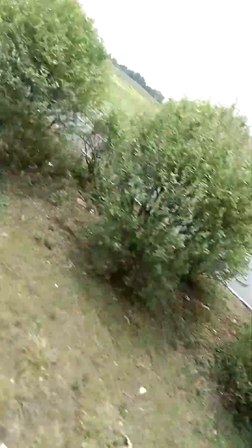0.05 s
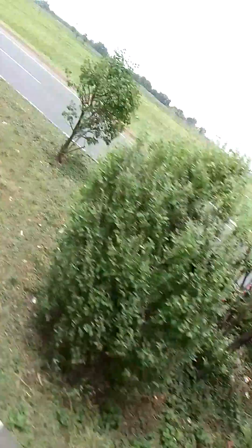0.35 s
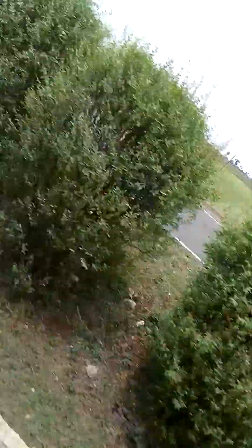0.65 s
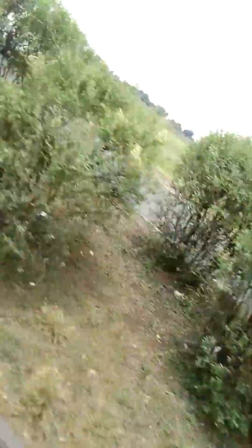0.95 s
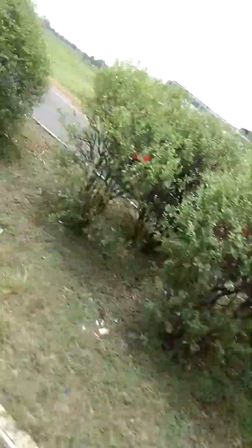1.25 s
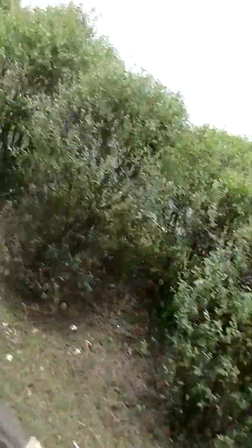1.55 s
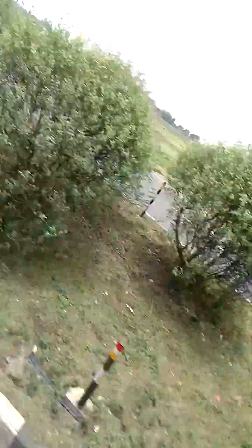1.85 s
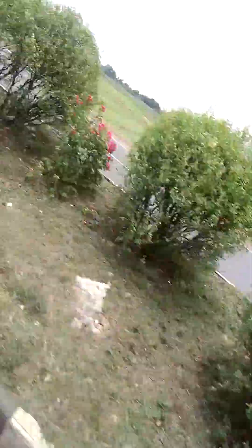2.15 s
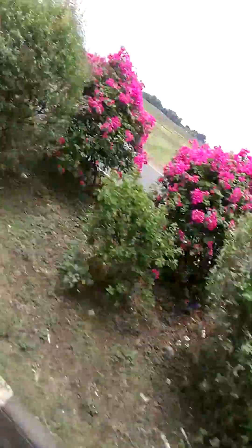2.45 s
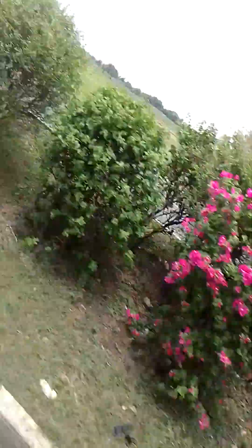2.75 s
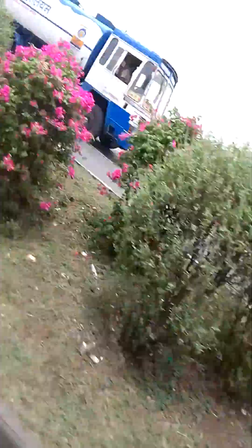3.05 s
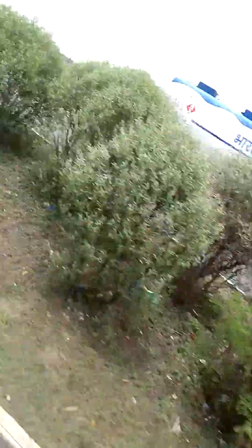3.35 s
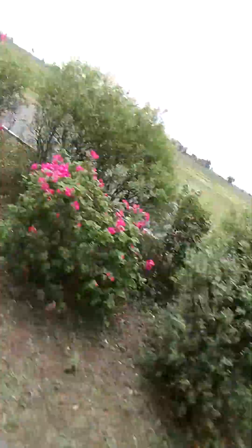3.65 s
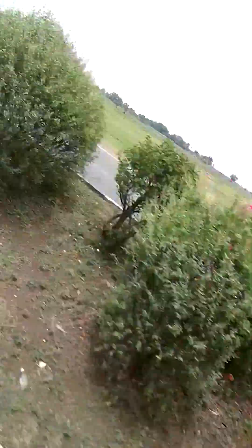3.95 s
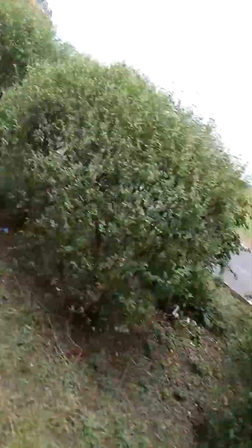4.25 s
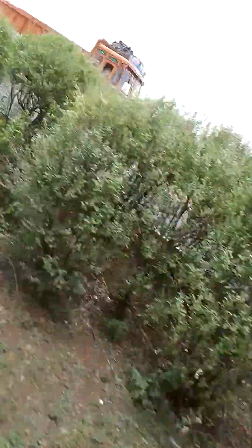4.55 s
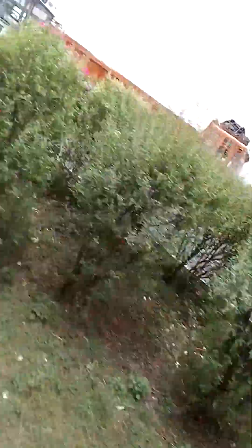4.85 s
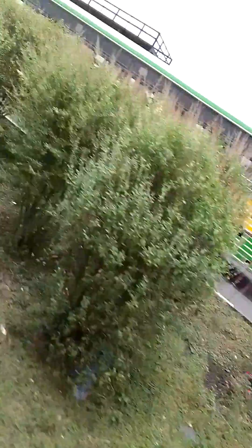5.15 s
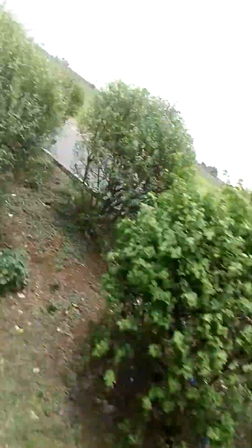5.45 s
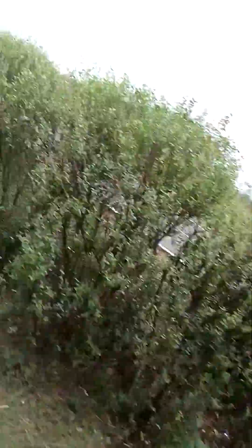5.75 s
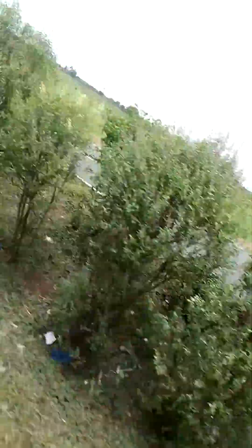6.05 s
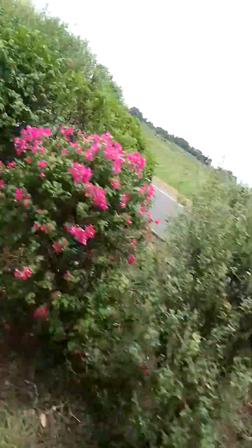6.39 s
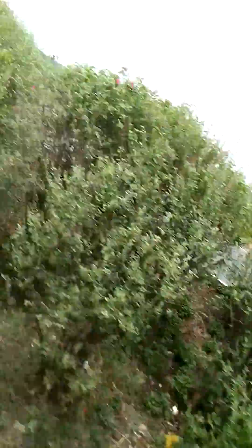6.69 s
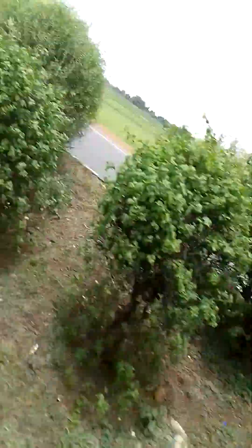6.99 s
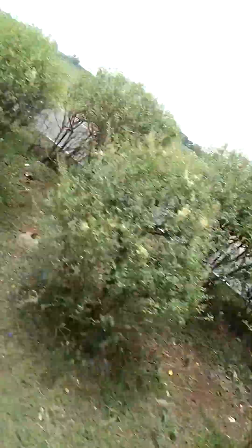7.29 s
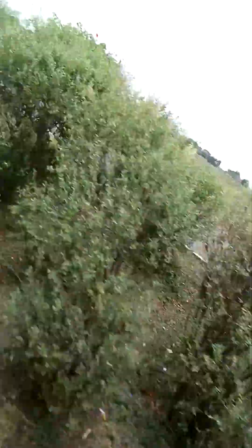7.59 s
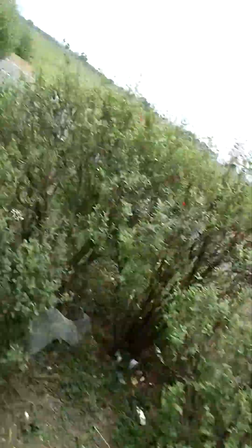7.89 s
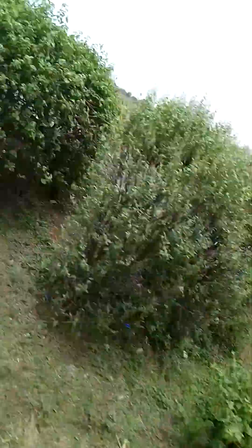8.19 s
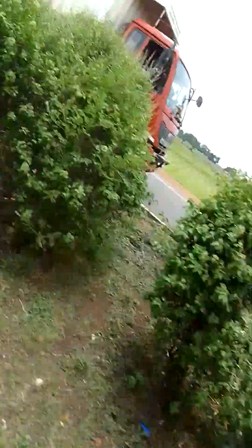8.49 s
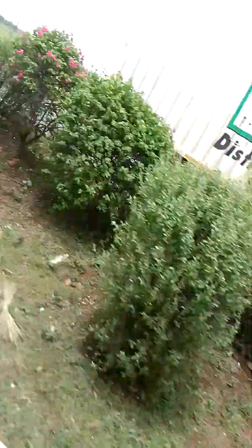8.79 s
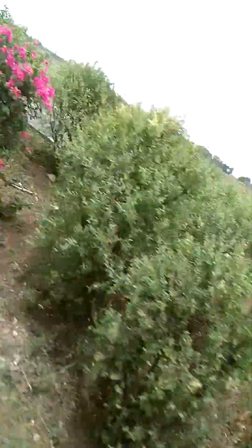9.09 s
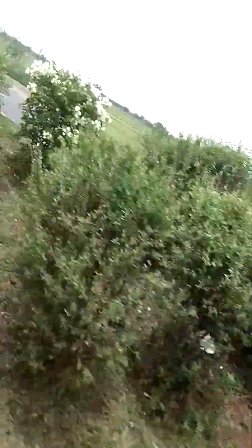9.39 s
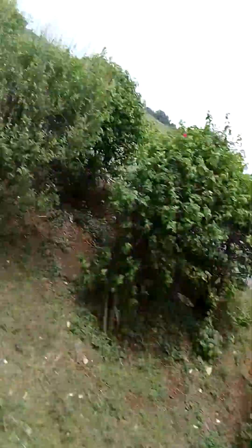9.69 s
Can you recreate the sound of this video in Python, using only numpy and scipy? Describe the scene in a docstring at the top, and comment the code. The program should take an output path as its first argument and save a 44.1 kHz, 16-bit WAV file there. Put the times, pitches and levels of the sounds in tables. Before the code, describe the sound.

Wind buffets a phone microphone in rapid, distorting blasts while a vehicle's engine hums and its tyres roar steadily underneath.

```python
"""At the open window of a vehicle on a highway, a phone is held in the slipstream.
Turbulent gusts tumble over its microphone port: large eddies thump, small ones rush and spit,
and the hardest overload the input and crackle. Underneath are the broadband roar of the tyres,
the harmonic drone of the engine, one short faint squeak, and a thin hiss and whistle of air
at the window edge."""
import sys
import numpy as np
from scipy import signal
from scipy.fft import rfft, irfft, next_fast_len
from scipy.io import wavfile
from scipy.ndimage import uniform_filter1d

SR = 44100
rng = np.random.default_rng(int(sys.argv[2]) if len(sys.argv) > 2 else 0)


def put_to_file(sound):
    """Save the sound as 16-bit audio at rate SR, in the file named by the first command-line argument."""
    columns = np.atleast_2d(sound).T  # one column per channel
    safe = np.clip(columns, -1, 1)
    whole_steps = np.round(safe * 32767)
    wavfile.write(sys.argv[1], SR, whole_steps.astype(np.int16))


N = 437913

# Strength of the steady slipstream: t/s, level/dB
STEADY_FLOW = [(0, -25.5), (1.2, -24.5), (2.7, -24.5), (3.6, -22.5), (4.5, -21.5), (6.0, -20.5), (7.4, -22),
               (9.0, -21.5), (9.93, -20)]
# Lulls in which the flow lifts off the phone: centre t/s, length/s
FLOW_LULLS = [(0.314, 0.029), (0.976, 0.07), (1.296, 0.034), (1.895, 0.017), (2.404, 0.092), (2.8, 0.091),
              (4.155, 0.02), (4.914, 0.027), (6.96, .05), (7.138, 0.067), (7.425, .05), (8.006, 0.11),
              (8.533, 0.039), (9.312, 0.042), (9.898, 0.098)]
# Gusts that break over the phone: start t/s, length/s, level/dB
FLOW_GUSTS = [(0.017, 0.091, -24), (0.182, 0.067, -19), (0.344, 0.13, -21), (0.498, 0.08, -18),
              (0.61, 0.052, -23), (0.859, 0.066, -19), (1.003, 0.17, -18), (1.375, 0.14, -19),
              (1.679, .13, -13), (1.925, 0.065, -24.5), (2.066, 0.11, -16.5), (2.195, 0.2, -15.5),
              (2.681, 0.071, -20.5), (2.942, 0.13, -21.5), (3.118, 0.069, -8.5), (3.215, 0.064, -16),
              (3.359, 0.095, -15), (3.496, .11, -12.5), (3.727, .14, -11), (3.91, 0.23, -16),
              (4.272, 0.16, -19), (4.683, 0.099, -7.5), (4.946, 0.014, -14), (5.056, 0.056, -12),
              (5.158, 0.073, -9), (5.24, 0.1, -22.5), (5.554, 0.055, -14.5), (5.712, 0.056, -10.5),
              (5.794, 0.2, -13.5), (6.01, 0.15, -15), (6.2, .1, -14.5), (6.357, 0.064, -10),
              (6.45, 0.1, -20.5), (6.713, 0.045, -6), (6.84, .11, -14), (7.023, 0.09, -15),
              (7.166, 0.05, -7), (7.256, .12, -14), (7.486, 0.256, -17.5), (7.811, 0.034, -9.5),
              (8.03, .12, -9.5), (8.186, 0.266, -11.5), (8.721, 0.28, -10), (9.084, 0.12, -11.5),
              (9.36, 0.26, -12), (9.649, 0.075, -19.5), (9.766, .05, -12.5)]
# Sharp eddies hitting the port head-on; each wind band takes a share of the level: t/s, level/dB
EDDY_BLASTS = [(0.529, 27), (1.065, 24), (1.495, 12), (1.722, 12), (1.951, 20), (2.081, 22.5), (3.065, 15),
               (3.13, 17), (3.182, 16), (3.565, 16), (3.832, 23), (3.923, 23.5), (3.987, 22), (4.294, 28),
               (4.357, 27), (4.718, 21), (4.753, 19), (5.084, 19), (5.198, 27), (5.352, 21), (5.879, 39),
               (5.907, 26), (6.226, 27), (6.371, 33), (6.393, 13), (6.51, 21), (6.733, 8), (6.875, 19),
               (6.936, 20), (7.316, 17), (7.629, 14), (7.832, 23), (8.058, 21), (8.133, -0.5), (8.223, 19),
               (8.245, 10), (8.262, 15), (8.335, 12), (8.393, 38), (8.818, 25), (8.904, 35), (8.947, 23),
               (9.173, 16), (9.48, 23), (9.586, 14), (9.615, 14), (9.677, 25), (9.785, 6.5)]
# Spectrum of the large eddies: f/Hz, relative level/dB
BUFFET_SPECTRUM = [(12, -32.5), (25, -5), (45, -6), (80, -0.5), (140, -0.5), (230, -4), (330, -7.5),
                   (500, -15.5), (900, -40.5)]
# Spectrum of the small eddies: f/Hz, relative level/dB
RUSH_SPECTRUM = [(120, -30.5), (280, -3), (420, -0.5), (600, -3.5), (900, -9.5), (1150, -9.5), (1320, -8),
                 (1600, -23.5), (2200, -46.5), (3200, -38.5), (6000, -57), (15000, -61)]
# Spectrum of the finest eddies: f/Hz, relative level/dB
TEAR_SPECTRUM = [(600, -16), (1400, 17), (3300, -4.5), (4500, -19.5), (8000, -27), (15000, -41)]
# Spectrum of the tyres' roar: f/Hz, relative level/dB
TYRE_SPECTRUM = [(25, -4.5), (70, -5), (220, 2.5), (450, -13.5), (650, -19), (880, -17.5), (1100, -12.5),
                 (1500, -9.5), (1800, -15.5), (2300, -17.5), (3100, -32), (5600, -35.5), (6900, -42),
                 (8100, -38.5)]
# Engine orders: multiple of the firing rate, rms level/dB
ENGINE_ORDERS = [(1, -48.5), (2, -29.5), (3, -31.5)]
# Whistle of air at the window edge: t/s, f/Hz, rms level/dB
EDGE_WHISTLE = [(0, 10550, -75), (1.0, 10550, -74), (2.1, 11600, -73), (2.9, 11450, -74), (4.0, 11200, -74),
                (5.6, 10300, -70), (6.5, 10200, -88)]


def wind(buffet_db=1.5, rush_db=-1.5, tear_db=-27.0, swirl_hz=24, flutter_hz=55, spit_hz=110):
    """Turbulent cascade: large eddies thump and shed small ones, which grow faster with the flow."""
    gust_db, blast_db = flow_level(), blast_level()
    flow_db = gust_db + 3.0 * drift(swirl_hz)
    large_db = 0.7 * flow_db + 0.46 * blast_db
    small_db = flow_db + 3.5 * drift(flutter_hz) + 0.53 * blast_db
    finest_db = gust_db + 4.5 * drift(spit_hz) + 0.76 * blast_db
    buffet = eddies(BUFFET_SPECTRUM, span_s=0.066) * from_db(buffet_db + large_db)
    rush = eddies(RUSH_SPECTRUM, span_s=0.021) * from_db(rush_db + small_db)
    tear = noise(TEAR_SPECTRUM) * from_db(tear_db + finest_db)   # bright edge of the hard blasts
    return buffet + rush + tear


def flow_level(lull_db=-9, rise_s=0.014, fall_s=0.039):
    """Incoherent addition: the powers of the gusts and the sagging slipstream sum to one level in dB."""
    t = seconds()
    (steady_db,) = in_time(STEADY_FLOW)
    sag_db = lull_db * sum(bell(centre, length) for centre, length in FLOW_LULLS)
    power = from_db(steady_db + sag_db) ** 2
    for start, length, db in FLOW_GUSTS:
        rise = 0.5 + (t - start) / rise_s
        fall = 0.5 + (start + length - t) / fall_s
        envelope = np.clip(np.minimum(rise, fall), 0, 1)
        power += (from_db(db) * envelope) ** 2
    return 10 * np.log10(power)


def blast_level(build_s=0.018, break_s=0.012):
    """Impact pressure: each head-on eddy builds up a boost in dB, then breaks off more quickly."""
    t = seconds()
    return sum(db * bell(peak, np.where(t < peak, build_s, break_s)) for peak, db in EDDY_BLASTS)


def eddies(spectrum, span_s):
    """Stationary turbulence: noise divided by its running rms is even over times beyond span_s."""
    pressure, size = noise(spectrum), int(span_s * SR)
    local_power = uniform_filter1d(uniform_filter1d(pressure ** 2, size), size)
    return pressure / np.sqrt(local_power + 1e-9)


def tyres(roar_db=-25, edge_hz=8530, ring_db=-37, ring_hz=1290):
    """Rolling noise: a broadband roar, with a narrow ringing band where the microphone port resonates."""
    roar = from_db(roar_db) * lowpass(noise(TYRE_SPECTRUM), edge_hz, order=16)
    port_ring = from_db(ring_db) * narrow_noise(ring_hz, width_hz=90)
    return roar + port_ring


def engine(firing_hz=64.86, waver=0.015):
    """Periodic excitation: firing at cruising speed gives harmonics of a slightly wavering rate."""
    phase = phase_of(firing_hz * (1 + waver * drift(5.5)))
    return sum(np.sqrt(2) * from_db(db) * np.sin(order * phase) for order, db in ENGINE_ORDERS)


def squeak(at_s=3.65, width_s=0.038, hz=1803, peak_db=-28.0):
    """Amplitude modulation: a Gaussian envelope shapes a nearly pure tone into one short squeak."""
    phase = phase_of(hz * (1 + 0.0011 * drift(27)))
    envelope = np.exp(-((seconds() - at_s) / width_s) ** 2)
    return from_db(peak_db) * envelope * np.sin(phase)


def window_air(hiss_db=-61.5):
    """Aerodynamic noise: air passing the window edge gives a faint hiss and a thin whistle."""
    whistle_hz, whistle_db = in_time(EDGE_WHISTLE)
    hiss = from_db(hiss_db) * rng.standard_normal(N)
    whistle = from_db(whistle_db) * narrow_noise(whistle_hz, width_hz=600)
    return hiss + whistle


def noise(spectrum):
    """Spectral shaping: coloured noise of rms 1, falling 12 dB per octave beyond the last point."""
    size = next_fast_len(N)
    hz = np.maximum(np.arange(size // 2 + 1) * SR / size, 1)
    points_hz, db = np.transpose(spectrum)
    gain = from_db(np.interp(np.log(hz), np.log(points_hz), db))
    rolloff = np.minimum(points_hz[-1] / hz, 1) ** 2
    white = rfft(rng.standard_normal(size))
    return rms_one(irfft(white * gain * rolloff, size)[:N])


def narrow_noise(hz, width_hz):
    """Quadrature modulation: a noise band of rms 1 round a steady or moving centre."""
    phase = phase_of(hz)
    return rms_one(drift(width_hz / 2) * np.cos(phase) + drift(width_hz / 2) * np.sin(phase))


def drift(hz):
    """Low-passed noise: a random wander of rms 1."""
    return rms_one(lowpass(rng.standard_normal(N + SR), hz, order=2)[SR:])


def lowpass(x, hz, order):
    """Maximally flat low-pass filter."""
    return signal.sosfilt(signal.butter(order, hz, fs=SR, output="sos"), x)


def phase_of(hz):
    """Phase as the time integral of frequency."""
    return 2 * np.pi * np.cumsum(hz * np.ones(N)) / SR


def bell(centre_s, length_s):
    """Gaussian swell of height 1."""
    return np.exp(-2 * ((seconds() - centre_s) / length_s) ** 2)


def in_time(rows):
    """Linear interpolation of a table's columns over time."""
    times, *columns = np.transpose(rows)
    return [np.interp(seconds(), times, column) for column in columns]


def seconds():
    """Time of every sample."""
    return np.arange(N) / SR


def from_db(db):
    """Level to amplitude ratio."""
    return 10 ** (np.asarray(db) / 20)


def rms_one(x):
    """Normalisation to unit rms."""
    return x / np.sqrt(np.mean(x ** 2) + 1e-20)


def scene():
    """Superposition: wind on the port adds to the sounds of the ride in one channel."""
    return (wind() + tyres() + engine() + squeak() + window_air())[None]


def record(dry, ceiling=0.66, release_db_per_ms=25.5, knee=13.4, soften_hz=9000, cutoff_hz=15900):
    """Overload: a very fast limiter flattens the gusts; filters round the corners and cut the top."""
    drive = signal.resample_poly(dry, 2, 1, axis=-1) / ceiling   # oversampled against aliasing
    drive_db = 20 * np.log10(np.abs(drive) + 1e-9)
    ms = 1000 * np.arange(2 * N) / (2 * SR)
    fall_db = release_db_per_ms * ms
    held_peak = from_db(np.maximum.accumulate(drive_db + fall_db, axis=-1) - fall_db)
    limited = ceiling * drive / (1 + held_peak ** knee) ** (1 / knee)
    pole = np.exp(-2 * np.pi * soften_hz / SR)
    softened = signal.lfilter([1 - pole], [1, -pole], signal.resample_poly(limited, 1, 2, axis=-1))
    return signal.sosfilt(signal.ellip(10, 0.1, 80, cutoff_hz, fs=SR, output="sos"), softened)


dry = scene()
out = record(dry)
put_to_file(out)
```